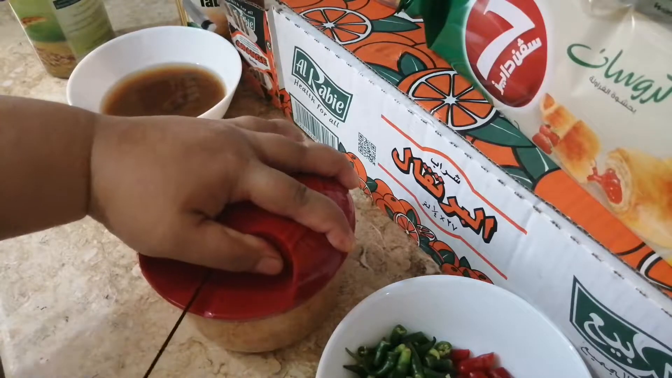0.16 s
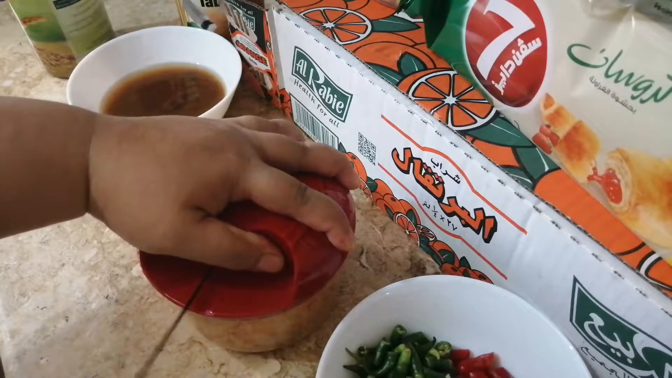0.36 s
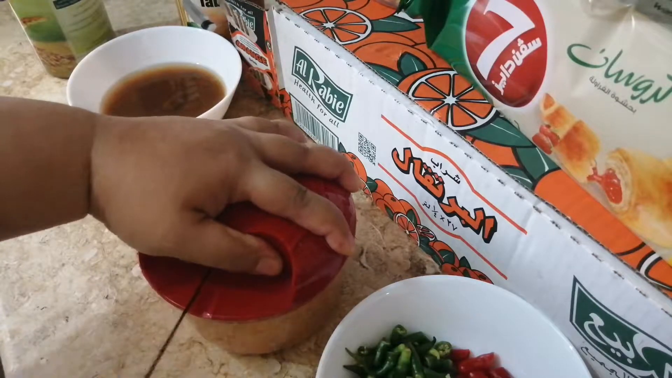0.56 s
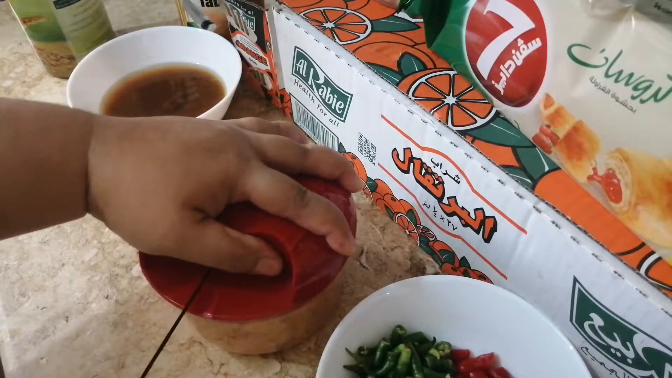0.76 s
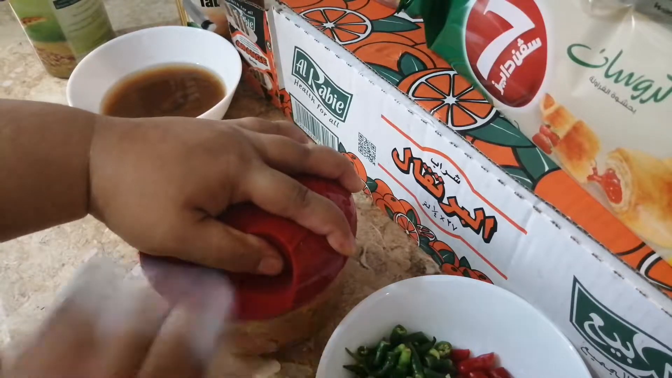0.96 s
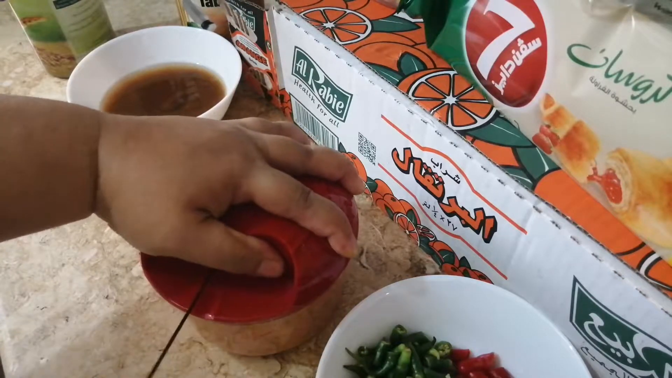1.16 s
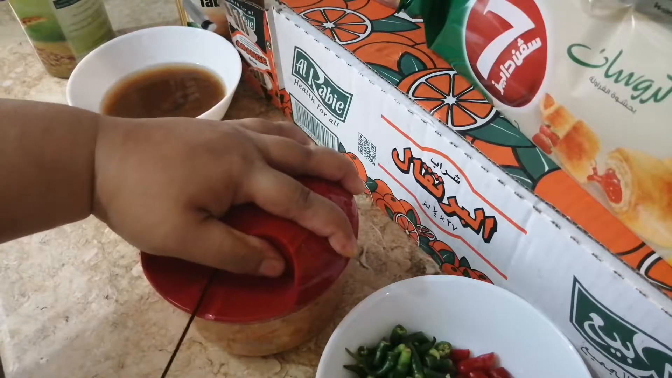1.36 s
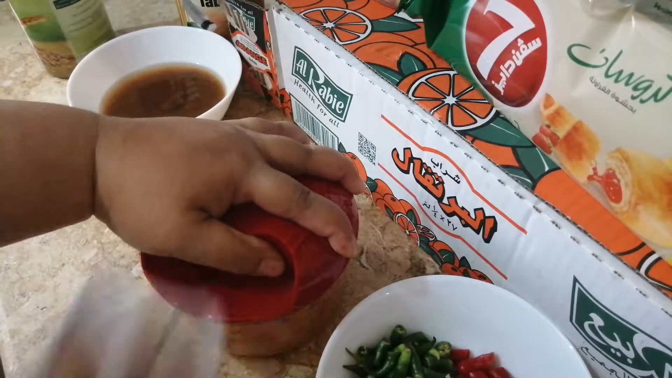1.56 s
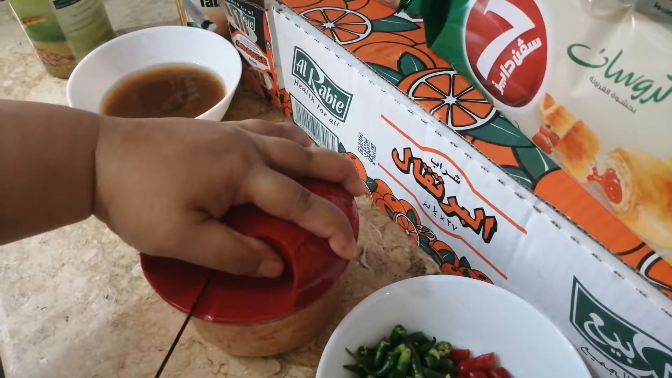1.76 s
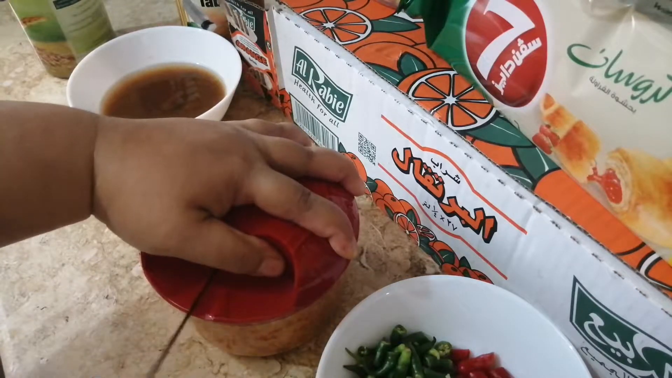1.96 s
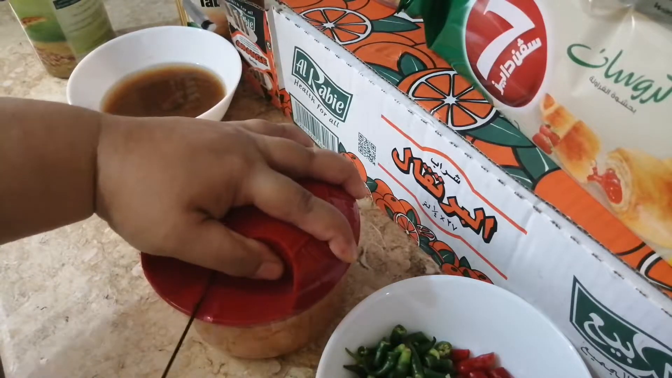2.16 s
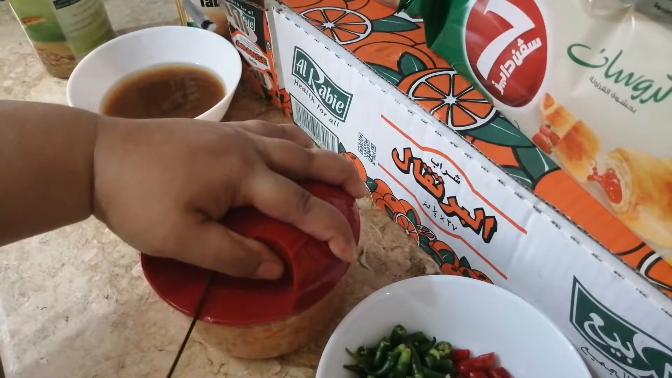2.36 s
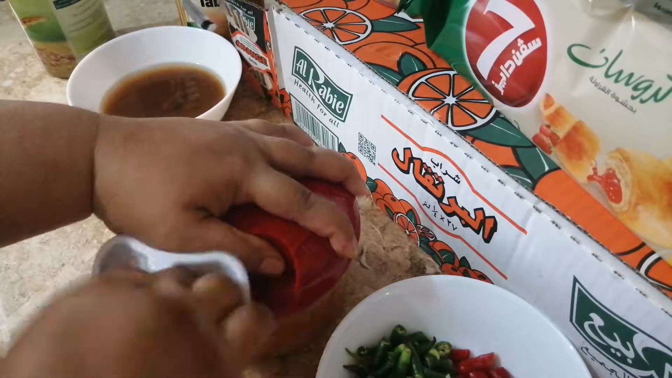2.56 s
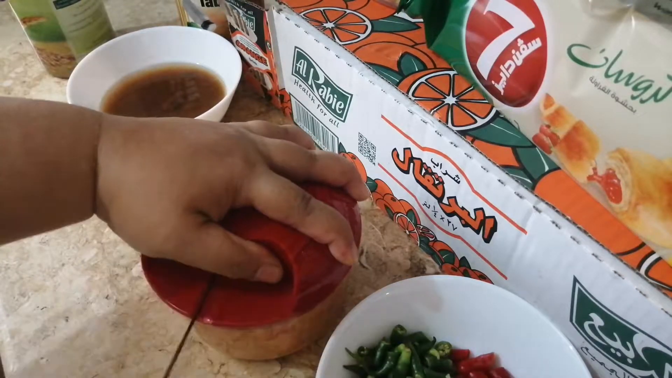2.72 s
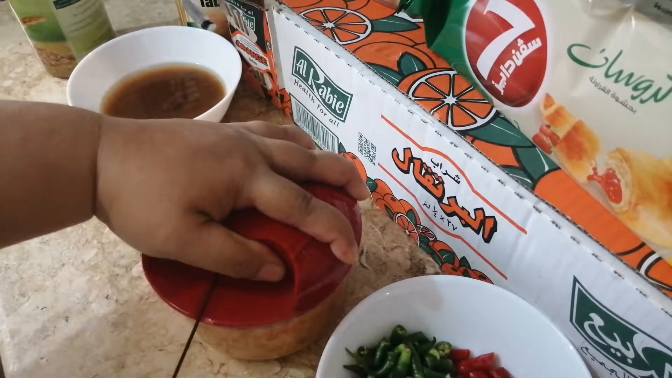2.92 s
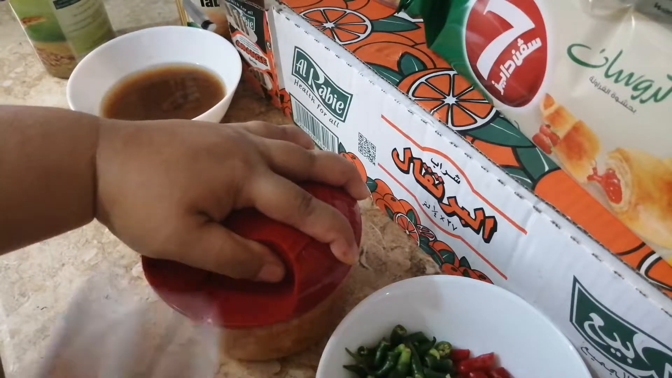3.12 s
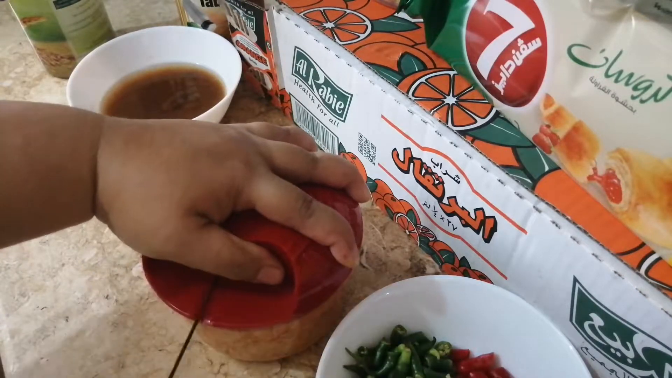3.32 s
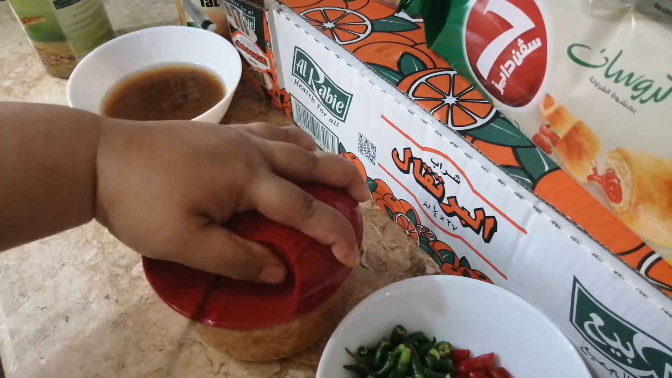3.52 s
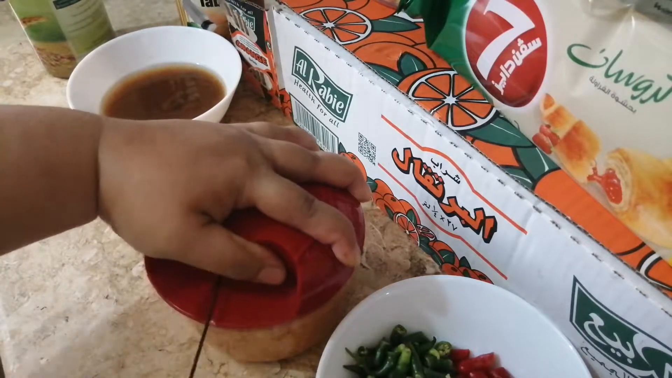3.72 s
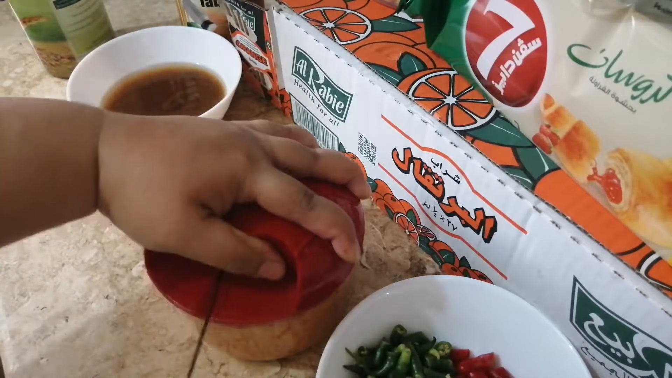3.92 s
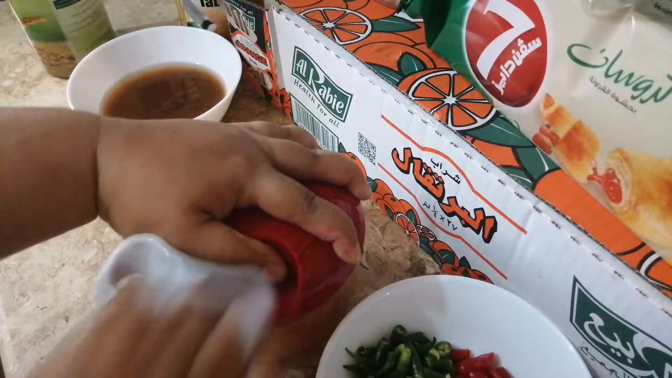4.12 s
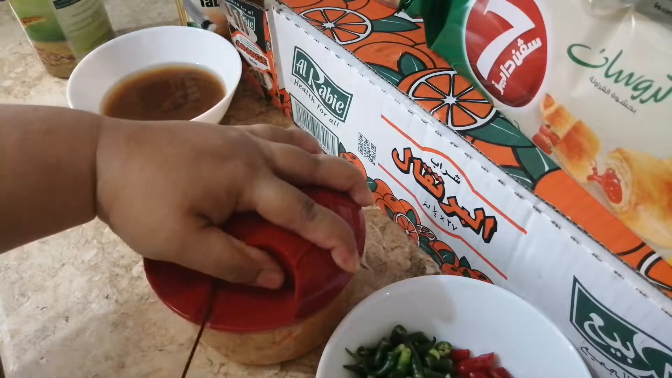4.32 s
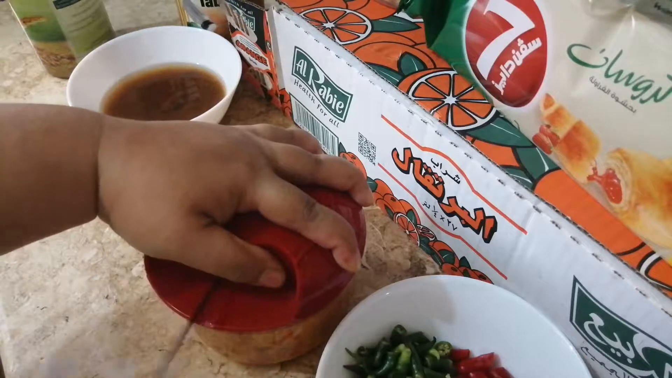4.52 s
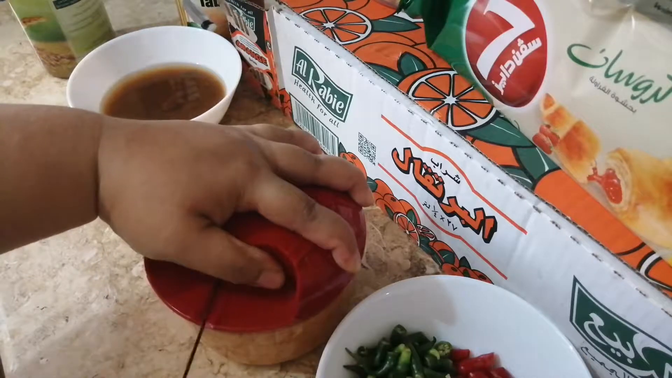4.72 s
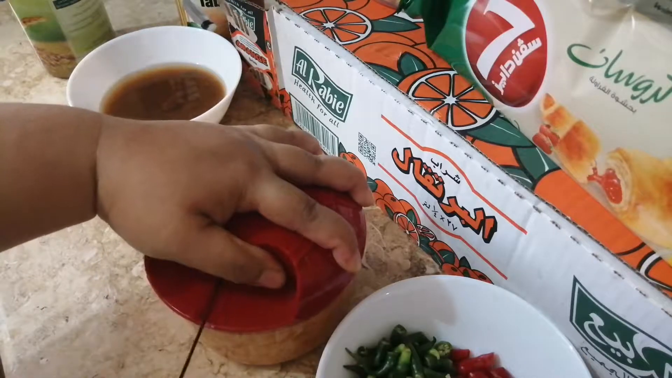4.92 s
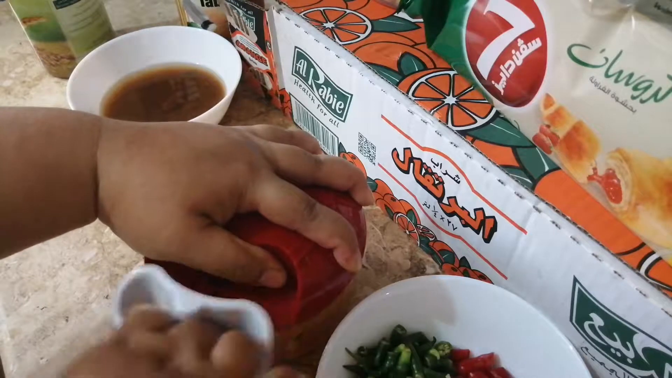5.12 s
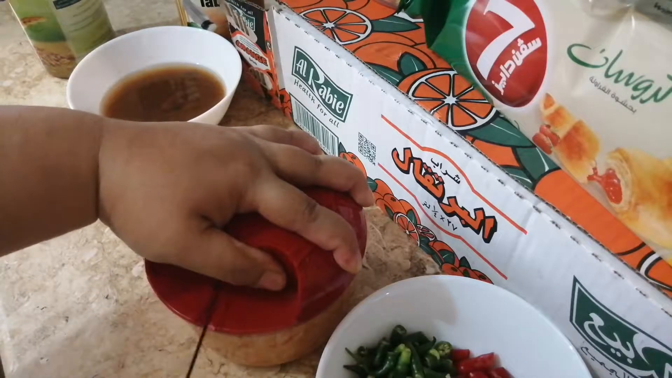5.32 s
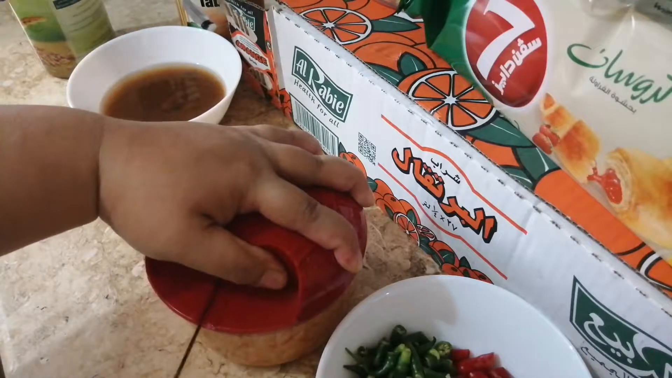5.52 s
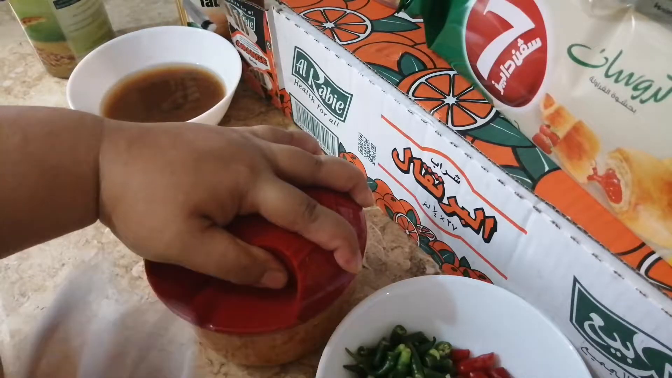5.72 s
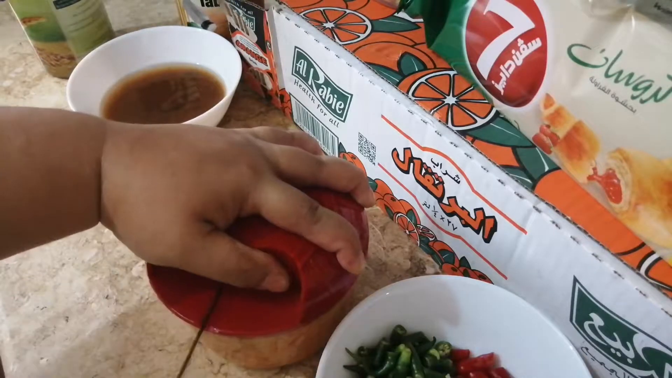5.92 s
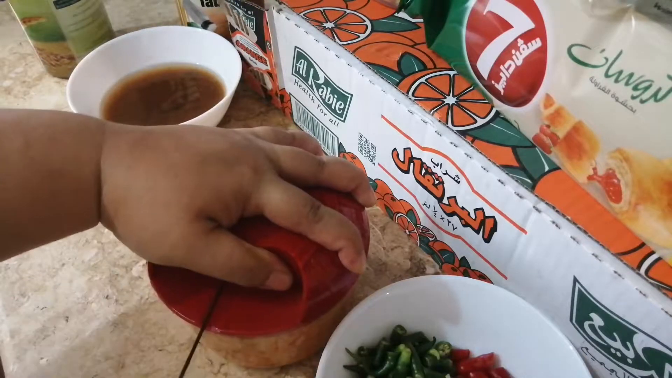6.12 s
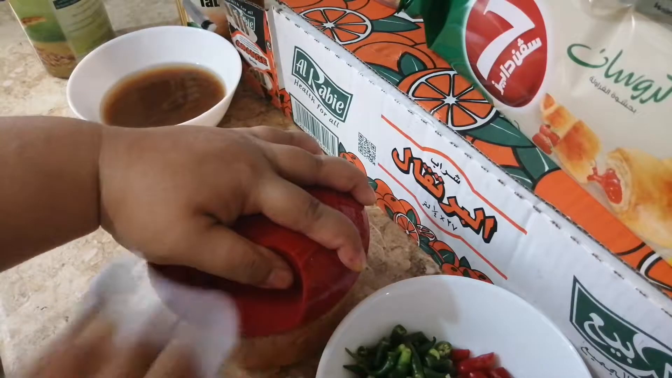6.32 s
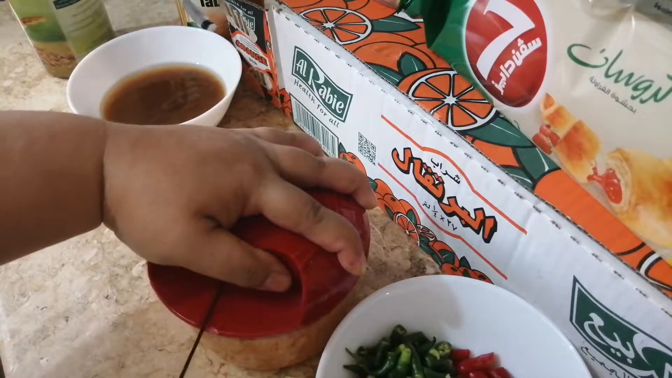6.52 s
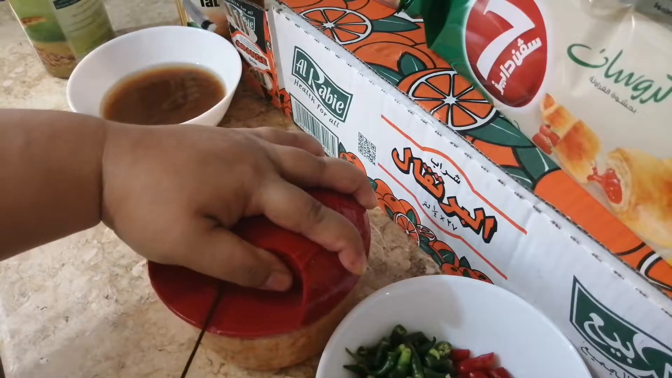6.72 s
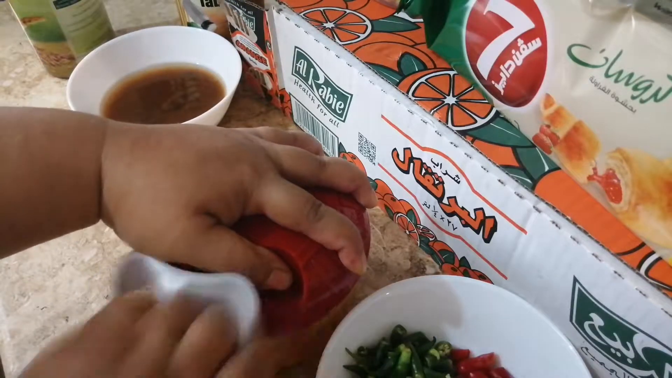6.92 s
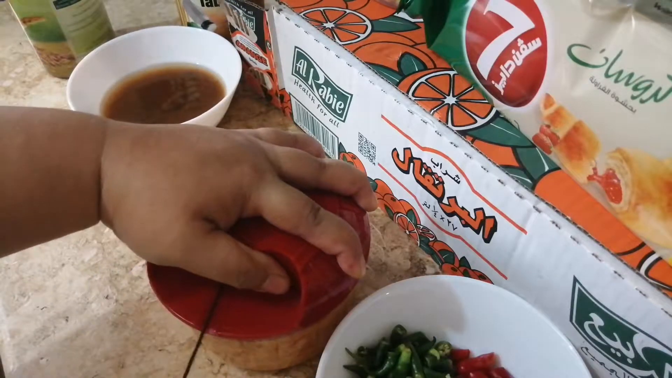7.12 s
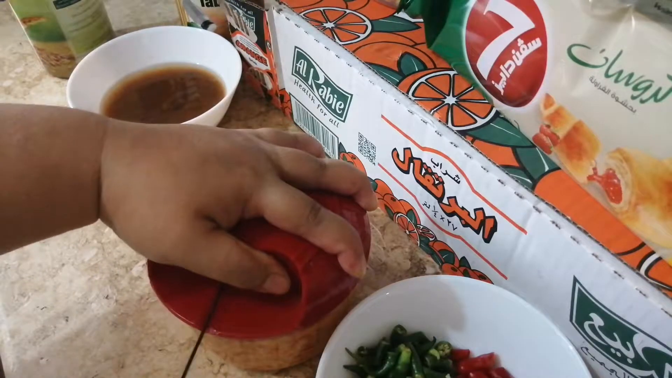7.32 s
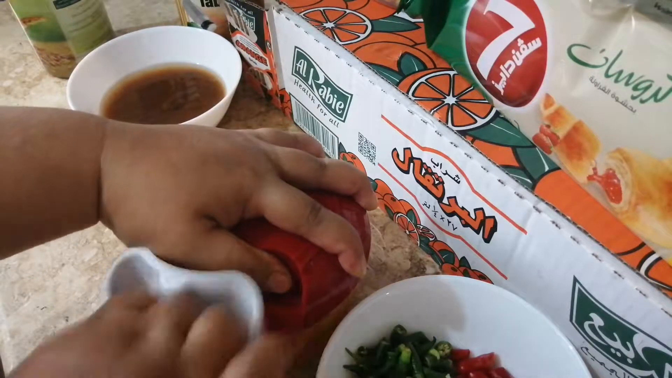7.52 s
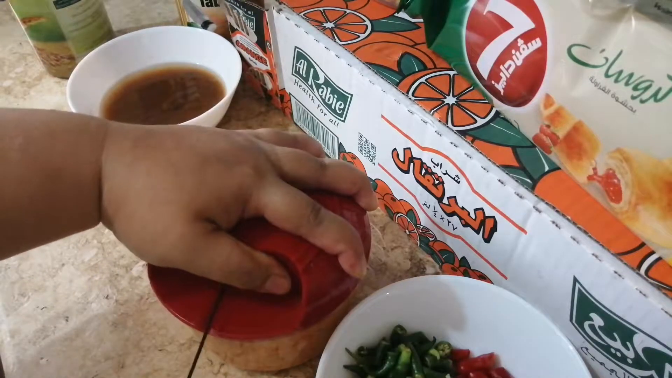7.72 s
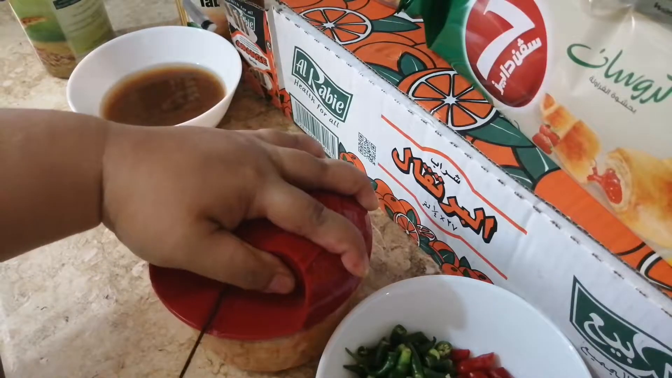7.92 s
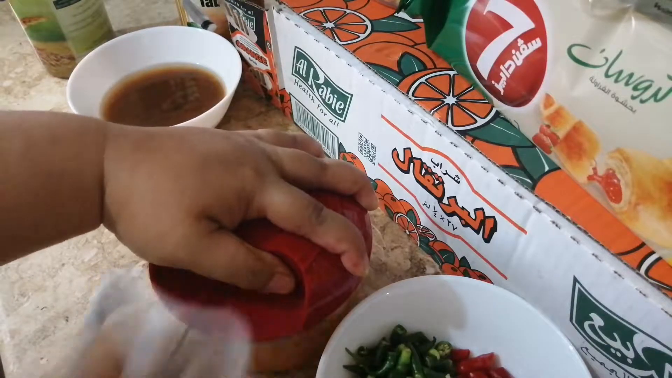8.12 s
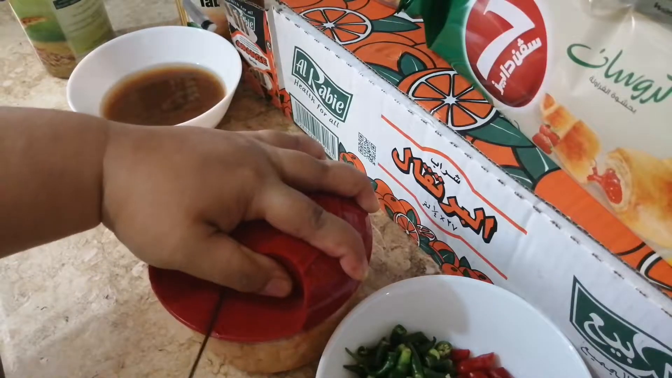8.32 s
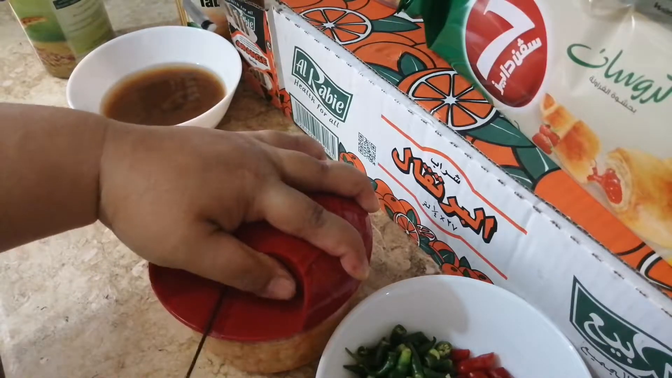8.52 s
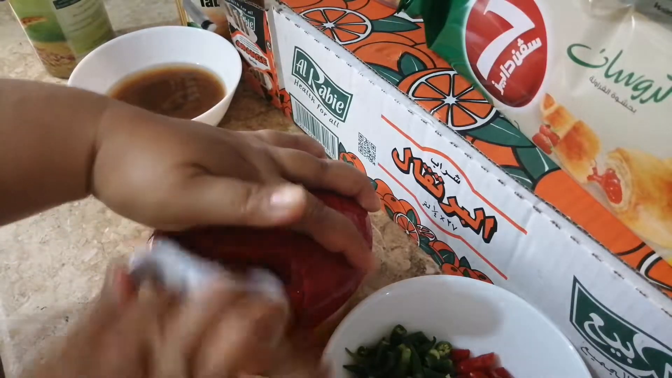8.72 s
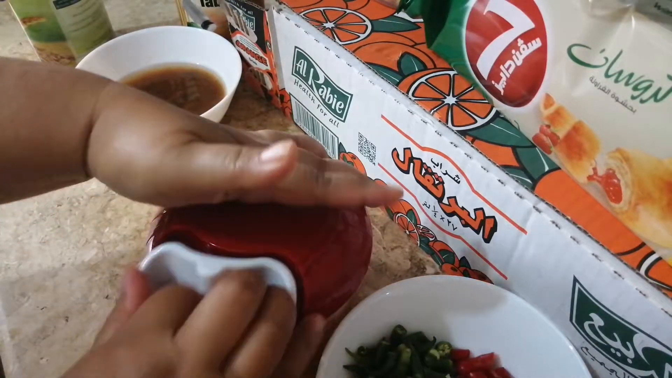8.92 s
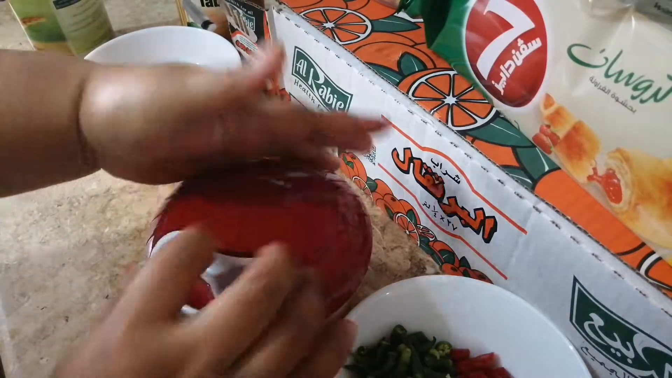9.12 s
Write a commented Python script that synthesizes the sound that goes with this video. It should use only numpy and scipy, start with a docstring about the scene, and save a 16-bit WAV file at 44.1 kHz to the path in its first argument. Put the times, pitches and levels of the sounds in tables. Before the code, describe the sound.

Quick, repeated pulls of a hand chopper rattle vegetable pieces around a plastic bowl, the cord ratcheting back until the handle snaps against the lid.

```python
"""Sixteen rattling yanks of a pull-cord food chopper, each followed by a hissing, clicking rewind.
It stands on a kitchen counter close to a phone, the left microphone facing it, the right one turned away.
Each pull catches the blades with a knock and flings vegetable pieces round a plastic bowl; then a spring
winds the cord back over a ratchet. The arm slowly tires. At the end the handle is let go and snaps
against the lid."""
import sys
import numpy as np
from scipy import signal
from scipy.fft import rfft, irfft, next_fast_len
from scipy.io import wavfile

SR = 44100
rng = np.random.default_rng(int(sys.argv[2]) if len(sys.argv) > 2 else 0)


def master(y):
    """Save y as 16-bit WAV."""
    cut = np.clip(np.atleast_2d(y).T, -1, 1)
    pcm = np.round(cut * 32767)  # scale
    wavfile.write(sys.argv[1], SR, pcm.astype(np.int16))


N = 408361
T = np.arange(N) / SR
FFT_SIZE = next_fast_len(N + SR)
HZ = np.maximum(np.arange(FFT_SIZE // 2 + 1) * SR / FFT_SIZE, 1)
TOP_HZ = 15900  # upper edge of the phone's range
TEETH_HZ = 47.84  # ratchet teeth passing the pawl each second

# pulls of the cord: t/s of the catch, length/s, strength/dB, knock level/dB
PULLS = [(-.028, .33, -34, -34), (.521, .3, -33, -32), (1.048, 0.29, -32, -30), (1.583, 0.28, -33, -33.5),
         (2.108, 0.27, -33, -35.5), (2.621, 0.28, -32.5, -33.5), (3.134, 0.27, -32, -32.5),
         (3.654, 0.25, -32, -29.5), (4.143, 0.27, -32, -33), (4.652, 0.3, -32.5, -38.5),
         (5.187, 0.27, -32, -31), (5.758, 0.28, -36, -33.5), (6.336, 0.35, -35, -38),
         (6.983, .308, -35, -35.5), (7.582, 0.3, -35, -35.5), (8.151, .305, -34.5, -32.5)]
# resonances of the plastic lid: f/Hz, level/dB
LID_SPECTRUM = [(40, -22), (150, -15), (450, -4), (800, -6.5), (1150, -2.5), (1700, -1), (2600, -2),
                (3300, 0.5), (4100, -6), (5150, 5), (6000, 0), (7050, 2), (8200, -14.5), (16000, -17)]
# resonances of the ratchet's pawl: f/Hz, level/dB
PAWL_SPECTRUM = [(200, -16), (900, -4), (2000, -12.5), (3400, -4.5), (4400, -21), (5200, 1.5), (6700, -3.5),
                 (8000, -20), (10000, -21.5), (16000, -22)]


def undb(db):
    """Decibels to gain."""
    return 10 ** (np.asarray(db) / 20)


def across(points, hz=HZ, column=1):
    """One column of a table over frequency, joined on a log axis."""
    table = np.array(points, float)
    return np.interp(np.log(hz), np.log(table[:, 0]), table[:, column])


def unit(x):
    """Scale to rms 1."""
    return x / np.sqrt(np.mean(x ** 2))


def add(out, s, x):
    """Mix x into out at time s."""
    i = int(s * SR)
    x, i = x[max(-i, 0):], max(i, 0)
    out[i:i + len(x)] += x[:N - i]


def walk(rate):
    """Random levels, so many a second, joined by lines; spread near 1."""
    count = int(N / SR * rate) + 2
    return np.interp(T * rate, np.arange(count), rng.standard_normal(count))


def impacts(rate, spread_db):
    """Random tiny impacts, so many a second, of uneven size; rms 1."""
    out, chance, size = np.zeros(N), rng.uniform(-1, 1, N), rng.standard_normal(N)
    happens = np.abs(chance) < rate / SR
    out[happens] = np.sign(chance[happens]) * undb(spread_db * np.clip(size[happens], -2, 2))
    return unit(out)


def body(x, spectrum, tilt_db=0, size=2048):
    """Ring x through a causal response of unit energy with this spectrum, its treble tilted per octave."""
    hz = np.maximum(np.arange(size // 2 + 1) * SR / size, 1)
    gain = undb(across(spectrum, hz) + tilt_db * np.log2(np.maximum(hz, 1500)))
    cepstrum = irfft(np.log(gain))
    cepstrum[1:size // 2] *= 2  # fold to minimum phase
    cepstrum[size // 2 + 1:] = 0
    response = irfft(np.exp(rfft(cepstrum)))
    return signal.oaconvolve(x, response / np.linalg.norm(response))[:len(x)]


def ping(hz, decay_s, size=4096):
    """One short-lived mode of a struck part."""
    return np.sin(2 * np.pi * hz * T[:size]) * np.exp(-T[:size] / decay_s)


def blow(spectrum, rise_s, decay_s, after_db, tilt_db=0, size=4096):
    """A brief rattling contact and the plastic's short after-ring; its energy is that of 3 ms at rms 1."""
    t = T[:size]
    after_ring = undb(after_db) * np.exp(-t / 0.0094)
    force = (1 - np.exp(-t / rise_s)) * (np.exp(-t / decay_s) + after_ring)
    x = body(rng.standard_normal(size) * force, spectrum, tilt_db)
    return x / np.linalg.norm(x) * np.sqrt(.003 * SR)


def strokes(rows, power, kick=0):
    """Gain as a power of speed, which swells (from a jolt, if kick > 0) and dies in each stroke."""
    out = np.zeros(N)
    for start, fastest, end, db in rows:
        span = slice(max(int(start * SR), 0), int(end * SR))
        speed = np.sin(np.pi * np.interp(T[span], [start, fastest, end], [kick, .5, 1]))
        out[span] += undb(db) * np.abs(speed) ** power
    return out


def pulls(rise_s=0.094, tiring_s_per_s=0.0047):
    """Outward strokes peak later as the arm tires: start/s, fastest/s, end/s, level/dB."""
    return [(s, s + rise_s + tiring_s_per_s * s, s + length, db) for s, length, db, _ in PULLS]


def rewinds(turn_s=.007, slack_s=0.0068, last_end_s=8.75):
    """Return strokes fill the gaps between pulls: start/s, fastest/s, end/s, level/dB."""
    typical_s, rise_s = 0.24, .068
    easing_db_per_s = -0.19  # the returning hand grows gentler
    rows, ends = [], [row[0] - slack_s for row in PULLS[1:]] + [last_end_s]
    for (_, _, pull_end, _), end in zip(pulls(), ends):
        start = pull_end + turn_s
        slowness = (end - start) / typical_s  # a slow rewind is softer and gathers speed later
        db = -4.5 * np.log2(slowness) + easing_db_per_s * (start - last_end_s / 2)
        rows.append((start, start + rise_s * slowness ** 1.5, end, db))
    return rows


def room_tail(x, wet_db, octaves=9):
    """Hard kitchen walls return a diffuse tail in octave bands, each dying at its own rate."""
    # colour of the room and the things on the counter: f/Hz, level/dB
    colour = [(100, 1.5), (500, -1), (1000, -1), (1500, 2), (2050, 4), (2550, -1), (3250, 1), (4100, -1),
              (5150, -1.5), (6100, -2), (7100, 1), (16000, -0.5)]
    # reverberation time: f/Hz, t60/s
    decay = [(150, 0.91), (1000, 0.81), (3000, .85), (6000, 0.85), (10000, 0.46), (16000, 0.26)]
    t, octave = T[:SR], np.log2(np.maximum(np.arange(SR // 2 + 1), 1) / TOP_HZ)
    noise, tail = rfft(rng.standard_normal(SR)), 0
    for k in range(octaves):
        band = irfft(noise * np.maximum(1 - np.abs(octave + k), 0), SR)
        tail = tail + band * undb(-60 * t / across(decay, TOP_HZ / 2 ** k))
    tail = body(tail * (1 - np.exp(-t / 0.01)), colour)
    return undb(wet_db) * signal.oaconvolve(x, tail / np.linalg.norm(tail))[:N]


def kitchen(chopper):
    """The chopper at close range, with the walls' tail behind it and faint room tone."""
    # room tone: f/Hz, level/dB
    room_tone = [(25, -14), (100, 10), (400, 2), (1000, -0.5), (3000, -28), (8000, -27), (16000, -40)]
    tail = room_tail(chopper, wet_db=-12)
    return chopper + tail + undb(-68.5) * body(rng.standard_normal(N), room_tone)


def shaded_microphone(near, behind):
    """Turned away, the right microphone hears a dull, late copy mixed with the far side of the bowl."""
    # right against left: f/Hz, level/dB, share of direct sound/0-1, phase lag/rad
    shading = [(40, 0, 0.35, 1), (223, -2.8, 0.68, 0.44), (431, 0, 0.38, 0.83), (499, -7.5, 0.45, 2.5),
               (670, -10.5, 0.3, 1.3), (946, -6, 0, 1.1), (1187, -18.5, 1, 5.5), (1480, -14.5, 1, 1.5),
               (2290, -23.5, 1, 3.5), (3040, -31, 0.4, -2), (4500, -40, 0.4, 8), (6750, -51, 0.3, 8),
               (16100, -29, 0.1, 4)]
    direct = np.clip(across(shading, column=2), 0, 1)
    late_copy = np.sqrt(direct) * np.exp(-1j * across(shading, column=3)) * rfft(near, FFT_SIZE)
    far_side = np.sqrt(1 - direct) * rfft(behind, FFT_SIZE)
    return irfft((late_copy + far_side) * undb(across(shading)), FFT_SIZE)[:N]


def cord_rub(effort, spectrum, rough_db):
    """The braided cord rubs through its eyelet in countless small slips."""
    slips = impacts(rate=5000, spread_db=1.5) + 0.7 * rng.standard_normal(N)
    # a faint, close echo off the counter shifts the colour of the rasp as the handle moves
    lag_s = 0.000603 * (1 + 0.24 * walk(14))
    echo = np.interp(T - lag_s, T, slips)
    rasp = unit((slips + 0.27 * echo) * undb(rough_db * walk(170)))
    return body(rasp * effort, spectrum)


def cord(zip_rise_s=0.059):
    """The cord hisses out and back in, zipping early in each rewind while the spring is still tight."""
    # hiss of the cord running out: f/Hz, level/dB
    out_spectrum = [(900, -39), (2500, -3), (3400, -6), (3900, -8.5), (4500, -5), (5300, 0), (6800, 1),
                    (7500, -10), (9000, -16.5), (12000, -17), (13600, -17.5), (14700, -12), (16000, -17)]
    # hiss of the cord running in: f/Hz, level/dB
    in_spectrum = [(900, -36.5), (2600, -12), (3300, -11), (4000, -11), (4700, -8), (5200, -1.5),
                   (6000, -4.5), (6800, 2.5), (7600, -9), (9000, -18), (12000, -16), (13600, -29),
                   (14700, -9), (16000, -24)]
    # bright zip of the cord running in fast: f/Hz, level/dB
    zip_spectrum = [(3000, -28), (6300, -11), (7400, 3.5), (8100, -2.5), (9000, -14), (12000, -17),
                    (16000, -17)]
    recoils = [(start, start + zip_rise_s, end, db) for start, _, end, db in rewinds()]
    outward = cord_rub(strokes(pulls(), power=1.42), out_spectrum, rough_db=2)
    inward = cord_rub(strokes(rewinds(), power=0.99, kick=0.088), in_spectrum, rough_db=1)
    zipping = cord_rub(strokes(recoils, power=2.2, kick=0.21), zip_spectrum, rough_db=5)
    return outward * undb(-4) + inward * undb(-40) + zipping * undb(-48.5)


def spool():
    """The spool rumbles backwards while the pawl skips over the ratchet teeth, some harder than others."""
    # resonances of the spool: f/Hz, level/dB
    spectrum = [(25, -37), (90, -6), (210, 1.5), (480, -1), (650, 3), (900, -2), (1150, 1.5), (1350, -4.5),
                (1600, -5.5), (2100, -11.5), (3400, -13), (6000, -32)]
    tooth_phase = np.cumsum(TEETH_HZ * (1 + .15 * walk(20))) / SR % 1
    skip = np.exp(-tooth_phase / 0.19) * undb(4.5 * np.clip(walk(46), -2, 2))
    rumble = unit(impacts(rate=2200, spread_db=1.5) * (1 + skip)) * strokes(rewinds(), power=1.73)
    ticks = unit(rng.standard_normal(N) * skip) * strokes(rewinds(), power=2.7)
    return body(rumble, spectrum) * undb(-40.5) + body(ticks, PAWL_SPECTRUM) * undb(-45.5)


def pawl(count=3, snap_db=-38, spread_db=0.5):
    """In each rewind the pawl snaps hard on a few teeth around full speed, ringing at one of its pitches."""
    # the pawl's loudest snaps: t/s, level/dB, ring f/Hz
    loud_snaps = [(.837, -41, 6300), (2.475, -29, 5200), (2.984, -29, 6300), (3.024, -30, 5080),
                  (3.524, -28, 5260), (4.004, -30, 6150), (4.496, -30, 5250), (4.565, -33.5, 3490),
                  (5.027, -31, 6330), (5.606, -28, 4980), (6.2, -27.5, 5050), (6.836, -33, 3560),
                  (7.444, -29, 5180), (8.018, -32, 5050), (8.555, -28.5, 6560), (8.612, -31.5, 6480)]
    # modes of the pawl: f/Hz
    pitches = [3460, 5150, 6350]
    out, snaps = np.zeros(N), list(loud_snaps)
    for _, fastest, _, db in rewinds():
        for tooth in rng.permutation(2 * count)[:count] - 1:
            strength_db = db + snap_db + spread_db * rng.standard_normal()
            snaps.append((fastest + tooth / TEETH_HZ, strength_db, rng.choice(pitches)))
    for s, db, hz in snaps:
        snap = blow(PAWL_SPECTRUM, rise_s=0.00015, decay_s=0.0018, after_db=-30)
        add(out, s, undb(db) * (undb(-2) * snap + ping(hz, decay_s=0.0035)))
    return out


def handle():
    """The handle clacks on the lid, and each clack sets the spring ringing."""
    # hard plastic clacks: t/s, level/dB, treble tilt/dB per octave
    clacks = [(.038, -32, -2), (.077, -31, -2), (.109, -37, -3), (1.073, -36.5, 5), (1.5551, -24.5, 0.5),
              (2.073, -27.5, 1), (2.155, -32.5, 0), (6.938, -32, -4), (6.949, -26.5, -2.5),
              (8.782, -40.5, -13), (8.804, -32.5, 0.5), (8.837, -44, -3), (8.899, -44.5, -2.5),
              (8.996, -41, 0), (9.002, -29.5, -0.5), (9.006, -21.5, 1.5), (9.011, -32, 1),
              (9.017, -26.5, -1)]
    # modes of the wound steel spring: f/Hz, level/dB, t60/s
    spring_modes = [(2060, -9, 0.98), (3200, -8, 0.41), (3570, -7, .7), (4603, -10, 0.39), (4770, -2, .7),
                    (5480, -14, 0.34), (7101, -10, .8)]
    out, t = np.zeros(N), T[:SR]
    ring = sum(undb(db - 60 * t / t60) * np.sin(2 * np.pi * hz * t) for hz, db, t60 in spring_modes)
    for s, db, tilt_db in clacks:
        clack = blow(LID_SPECTRUM, rise_s=0.00025, decay_s=0.0013, after_db=-11, tilt_db=tilt_db)
        add(out, s, undb(db) * (clack + undb(-11) * ping(hz=5210, decay_s=0.004)))
        add(out, s, undb(db - 44) * ring)
    return out


def knocks(catch_hz=636, spread_octaves=0.41):
    """Dull knocks: the drive catches the blades as each pull starts, and a blade meets a hard piece."""
    # hard pieces met by a blade: t/s, level/dB, ring f/Hz
    hard_pieces = [(.037, -24, 1120), (0.106, -26, 677), (0.335, -30, 980), (1.112, -25, 740),
                   (3.197, -28.5, 670), (5.82, -27, 1130), (5.829, -26.5, 1176), (5.842, -26, 726),
                   (5.855, -28, 620)]
    # colour of a knock: f/Hz, level/dB
    spectrum = [(40, -14), (120, -14), (200, -6.5), (400, -3), (600, -2), (850, -8), (1150, -4),
                (1500, -10), (2500, -14), (4000, -14.5), (6500, -5.5), (9000, -25), (16000, -30)]
    out = np.zeros(N)
    ring_hz = catch_hz * 2 ** (spread_octaves * (2 * rng.random(len(PULLS)) - 1))
    catches = [(s, db, hz) for (s, _, _, db), hz in zip(PULLS, ring_hz)]
    for s, db, hz in catches + hard_pieces:
        thud = blow(spectrum, rise_s=0.0017, decay_s=0.0054, after_db=-19, tilt_db=-1.5)
        swell = 1 - np.exp(-T[:len(thud)] / 0.0022)
        add(out, s, undb(db) * (undb(-2) * thud + undb(1) * swell * ping(hz, decay_s=0.0052)))
    return out


def chopping(finer_db_per_s=-0.36):
    """Pieces hit the hollow bowl in dense showers, stronger each time a blade sweeps through the heap."""
    # resonances of the plastic bowl: f/Hz, level/dB
    bowl_spectrum = [(25, -32), (60, -10.5), (130, -8.5), (210, 2), (300, -7.5), (450, -3), (660, 2.5),
                     (780, -4), (900, -1.5), (1150, -6), (1350, -11.5), (3200, -16), (5000, -28.5),
                     (12000, -38)]
    # hollow modes of the bowl on the counter: f/Hz, level/dB, decay/s
    hollow_modes = [(105.8, -48, 0.034), (360, -54.5, 0.013)]
    blade_speed = strokes([(start, fastest, end, 0) for start, fastest, end, _ in pulls()], power=0.99)
    blade_hz = (25 + 45 * blade_speed) * (1 + .15 * walk(30))
    sweep = undb(2.1 * np.sin(2 * np.pi * np.cumsum(blade_hz) / SR))
    pieces = impacts(rate=1400, spread_db=2.5) + 0.32 * rng.standard_normal(N)
    effort = strokes(pulls(), power=1.45)
    force = unit(pieces * sweep) * effort
    # as the pieces get finer they thump the bowl less
    thump = sum(undb(db) * ping(hz, decay_s, size=8192) for hz, db, decay_s in hollow_modes)
    hollow = signal.oaconvolve(force * undb(finer_db_per_s * T), thump)[:N]
    # now and then a crisp piece ticks against the lid
    ticks = body(impacts(rate=90, spread_db=2.5) * effort, LID_SPECTRUM) * undb(-15)
    return body(force, bowl_spectrum) * undb(-1.34) + hollow + ticks


def scene():
    """The chopper on the counter, close up: facing microphone left, shaded microphone right."""
    hiss = cord()
    struck = knocks() + pawl() + handle()
    near = kitchen(chopping() + spool() + struck + hiss)
    # the food on the far side of the bowl rattles on its own
    behind = kitchen(chopping() + spool() + .5 * struck)
    return np.array([near, shaded_microphone(near, behind)])


def record(dry):
    """The phone cuts the highest treble steeply."""
    return signal.sosfilt(signal.ellip(10, .2, 70, TOP_HZ, fs=SR, output="sos"), dry)


dry = scene()
out = record(dry)
master(out)
```